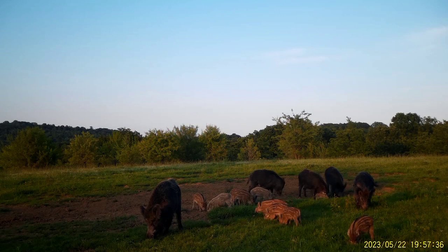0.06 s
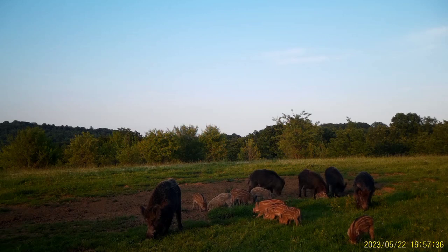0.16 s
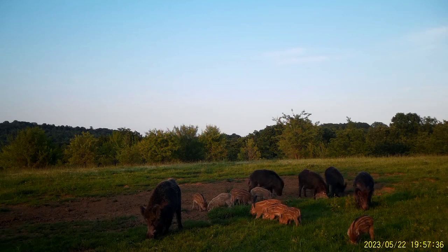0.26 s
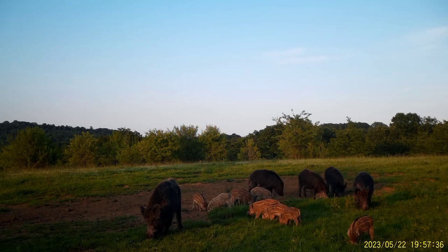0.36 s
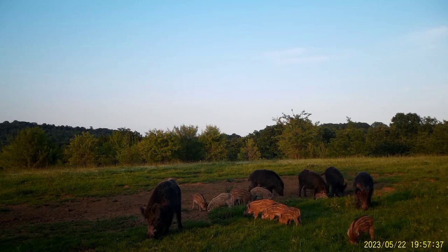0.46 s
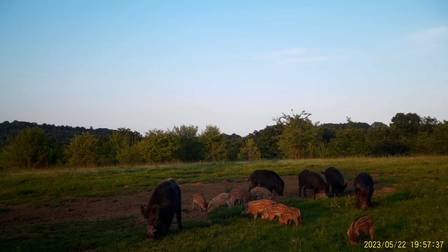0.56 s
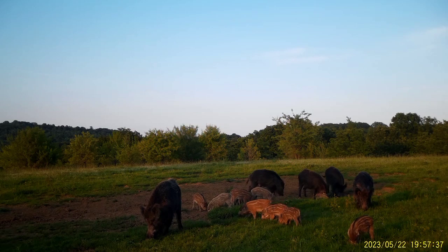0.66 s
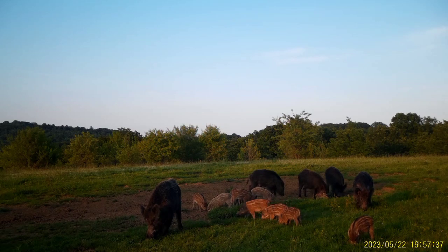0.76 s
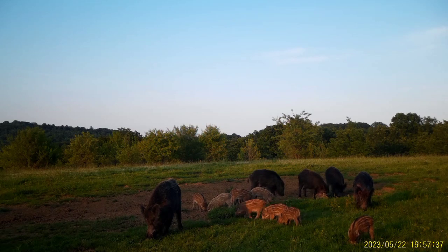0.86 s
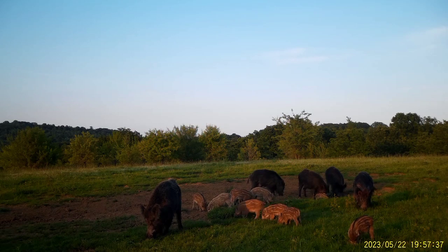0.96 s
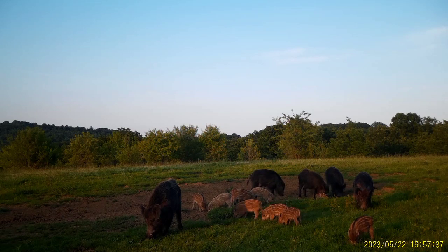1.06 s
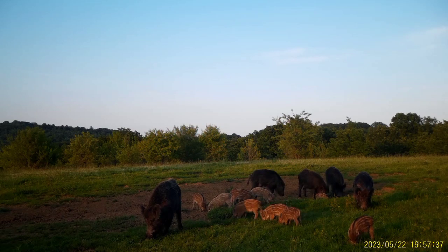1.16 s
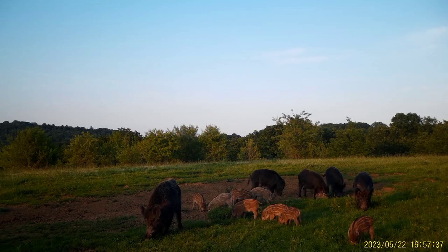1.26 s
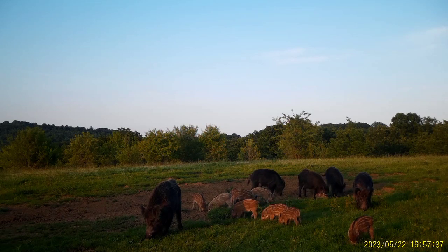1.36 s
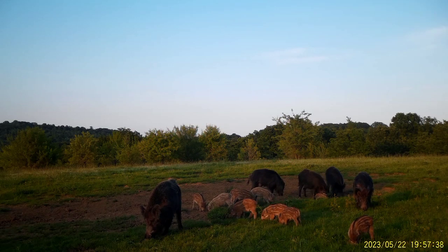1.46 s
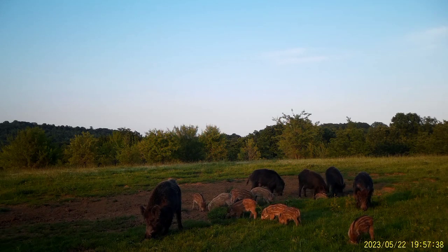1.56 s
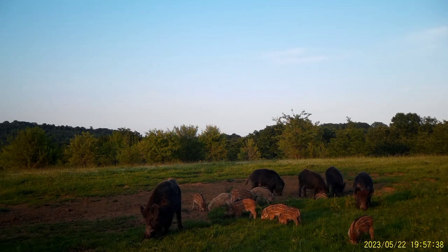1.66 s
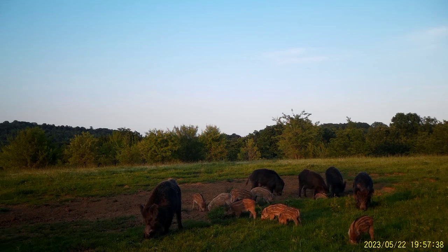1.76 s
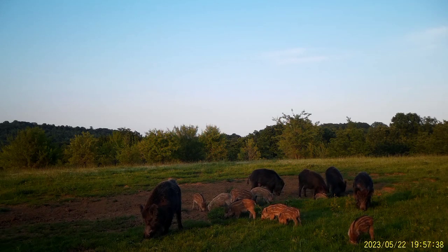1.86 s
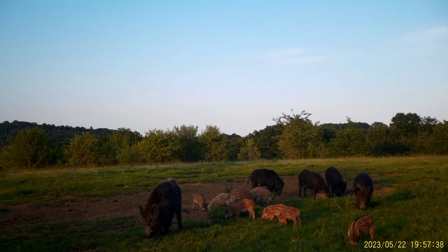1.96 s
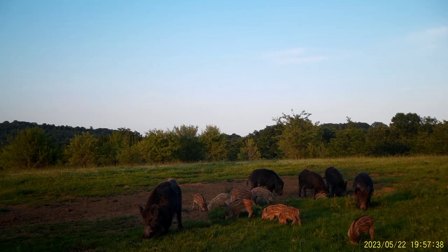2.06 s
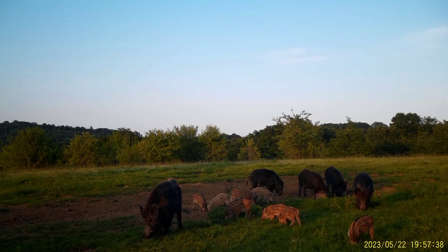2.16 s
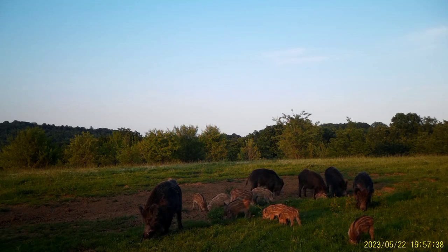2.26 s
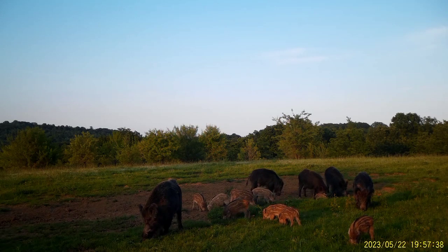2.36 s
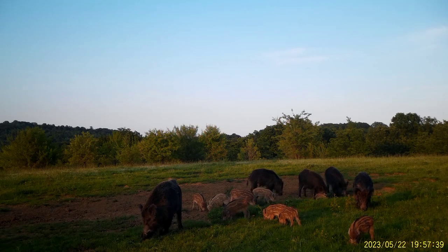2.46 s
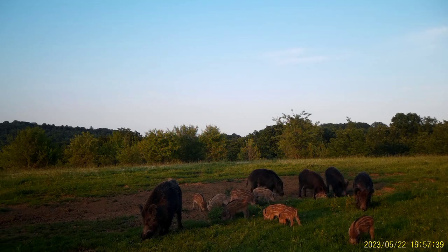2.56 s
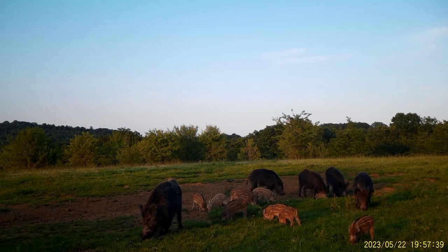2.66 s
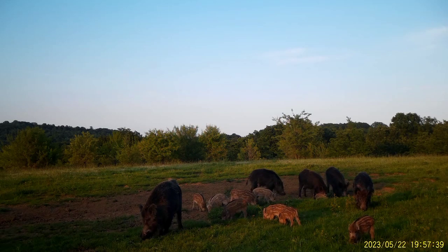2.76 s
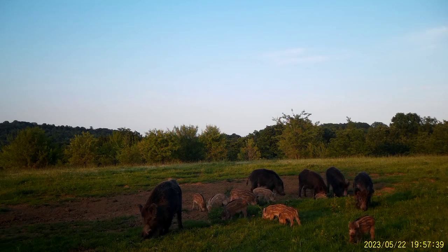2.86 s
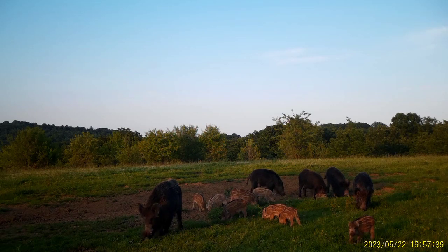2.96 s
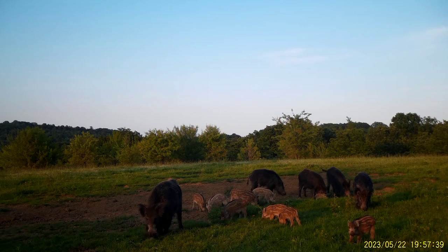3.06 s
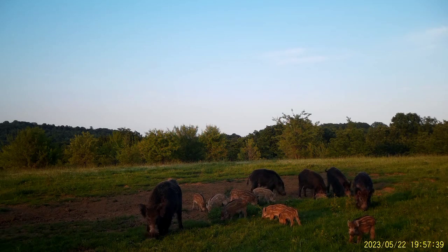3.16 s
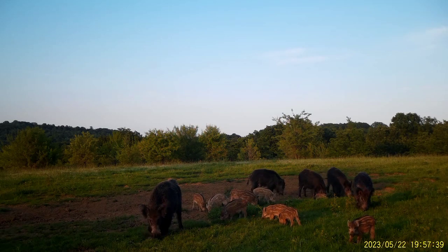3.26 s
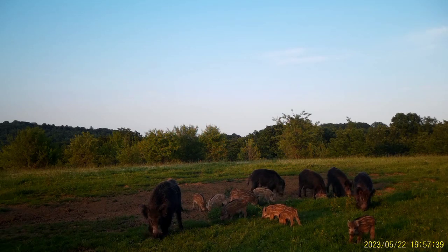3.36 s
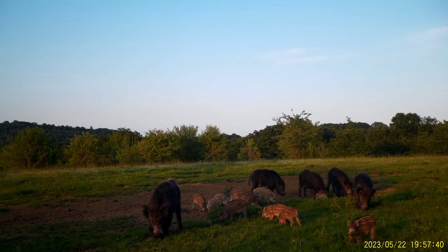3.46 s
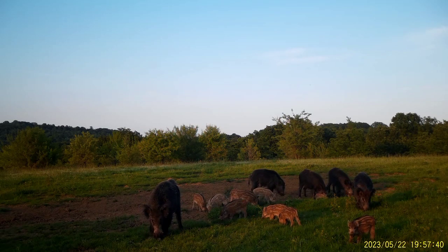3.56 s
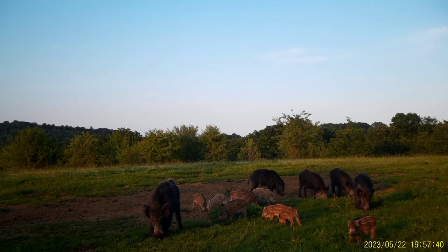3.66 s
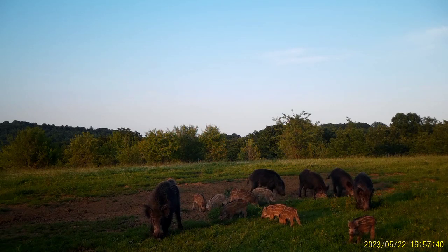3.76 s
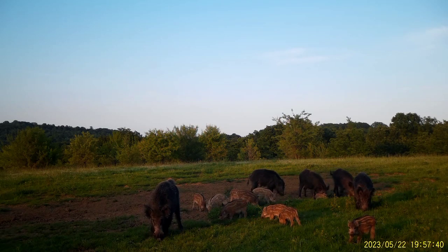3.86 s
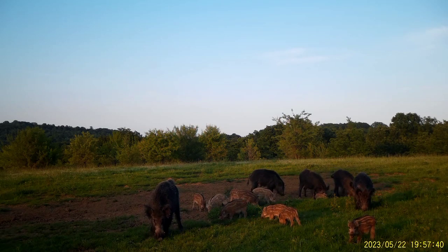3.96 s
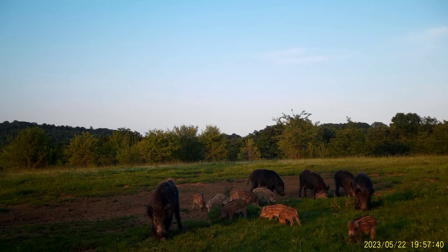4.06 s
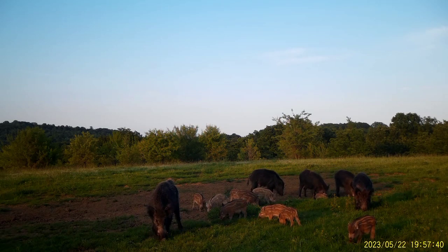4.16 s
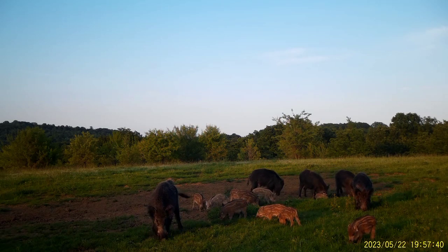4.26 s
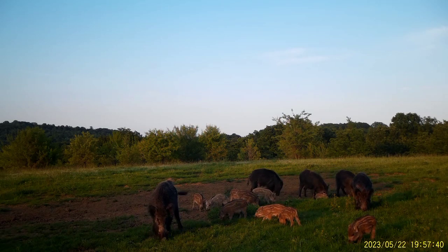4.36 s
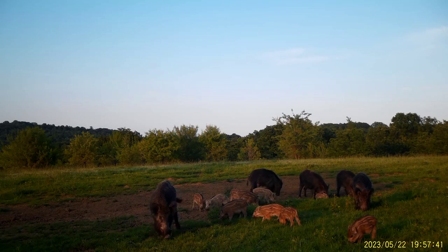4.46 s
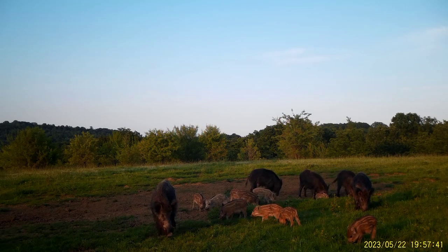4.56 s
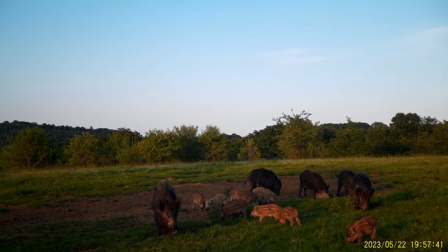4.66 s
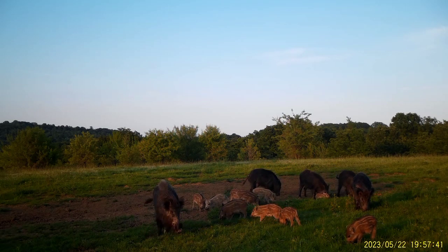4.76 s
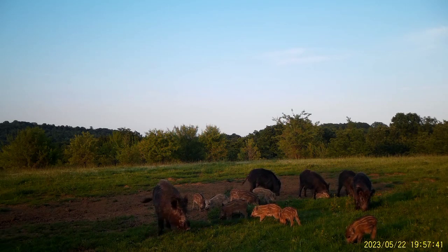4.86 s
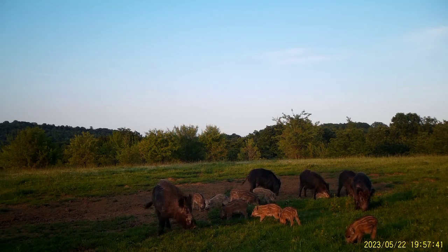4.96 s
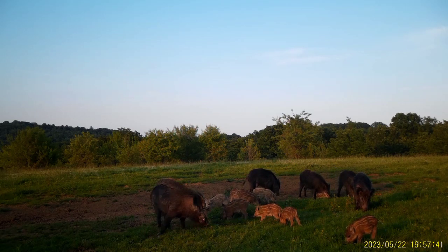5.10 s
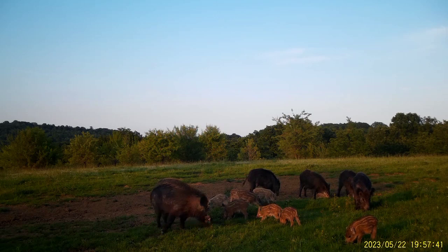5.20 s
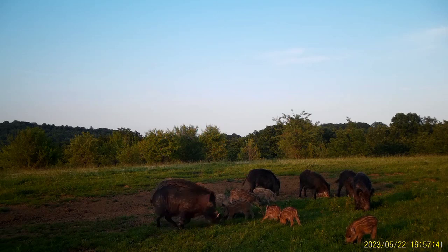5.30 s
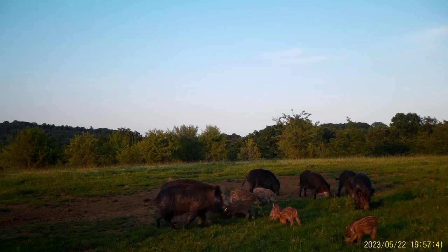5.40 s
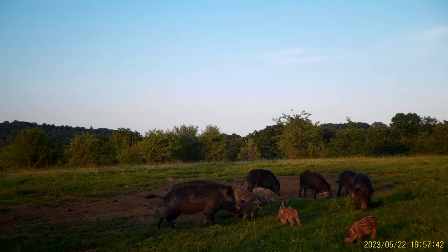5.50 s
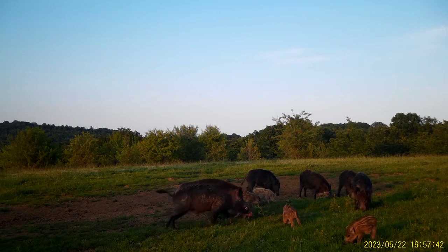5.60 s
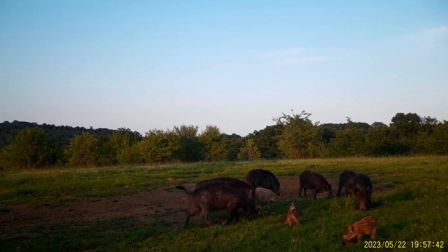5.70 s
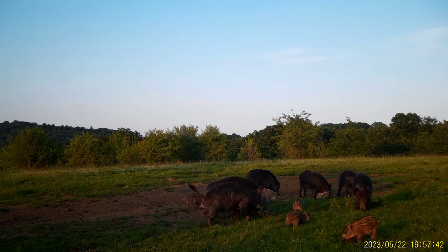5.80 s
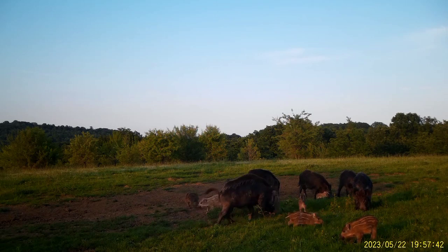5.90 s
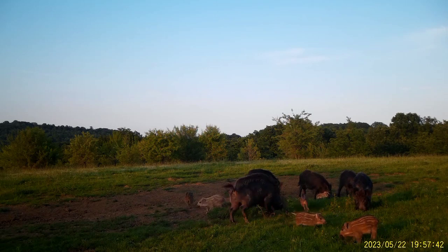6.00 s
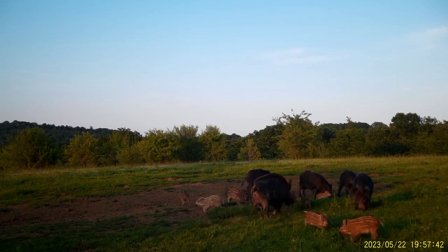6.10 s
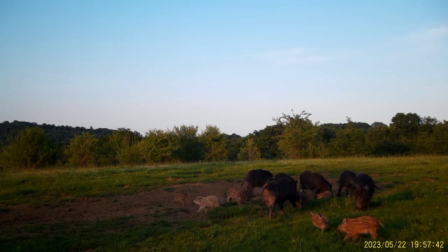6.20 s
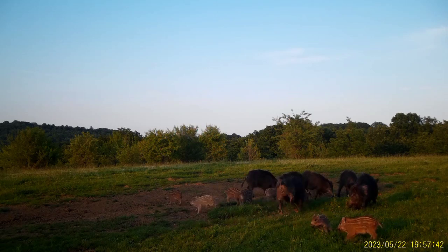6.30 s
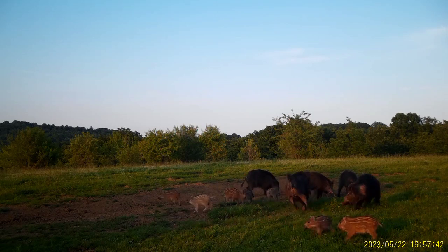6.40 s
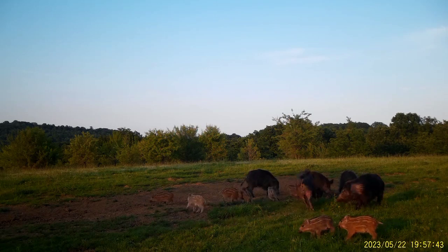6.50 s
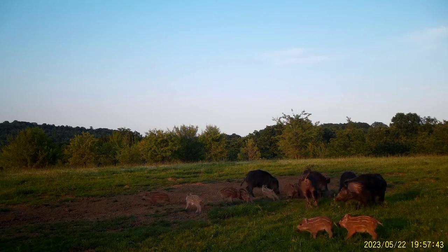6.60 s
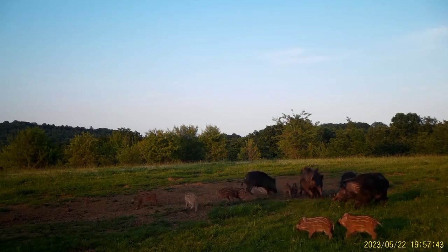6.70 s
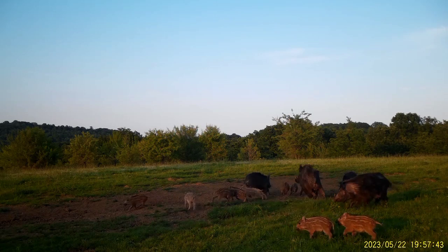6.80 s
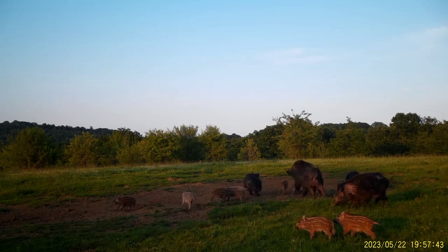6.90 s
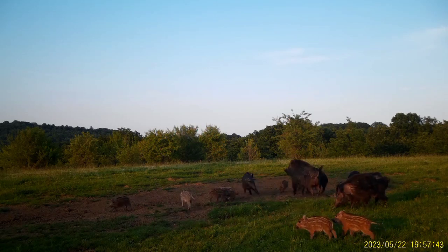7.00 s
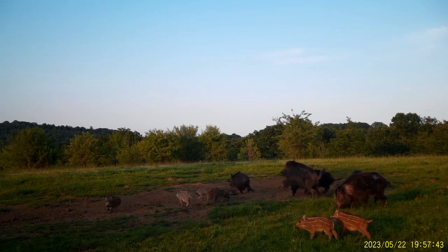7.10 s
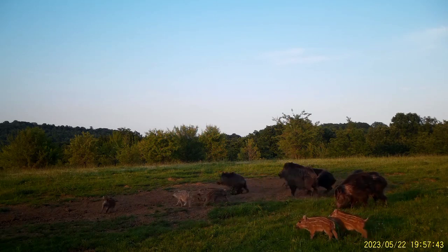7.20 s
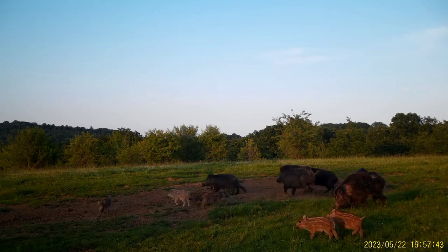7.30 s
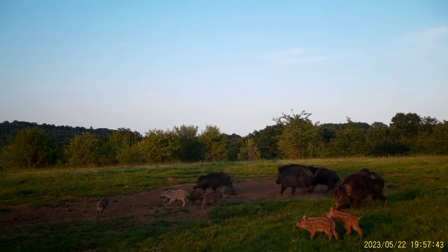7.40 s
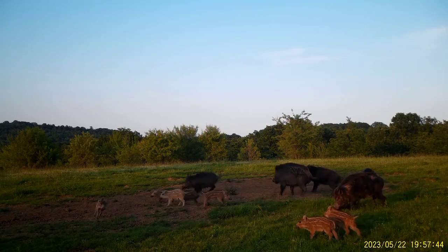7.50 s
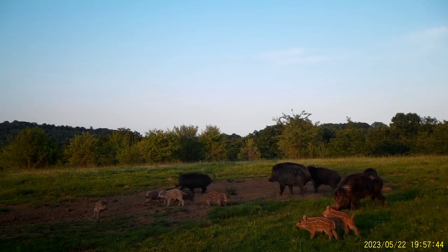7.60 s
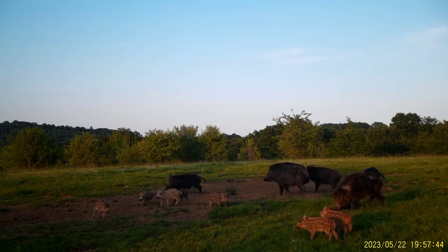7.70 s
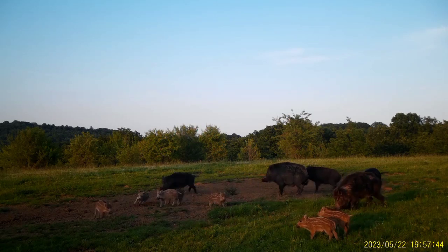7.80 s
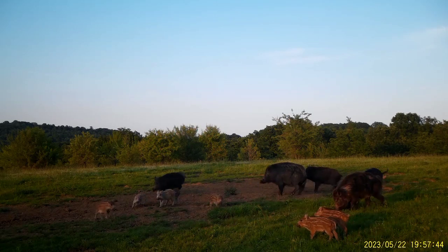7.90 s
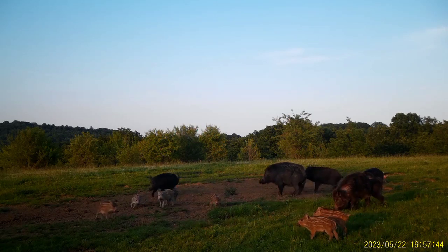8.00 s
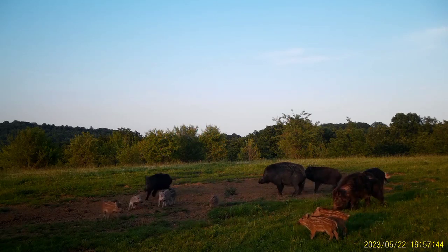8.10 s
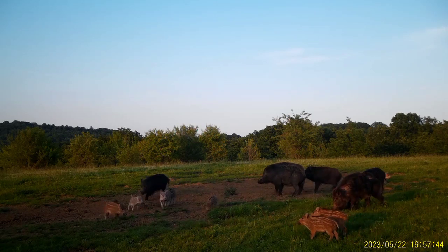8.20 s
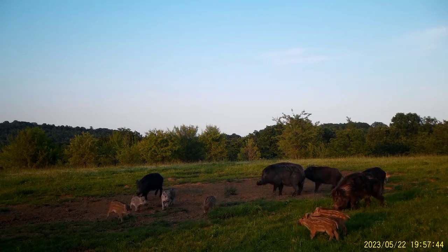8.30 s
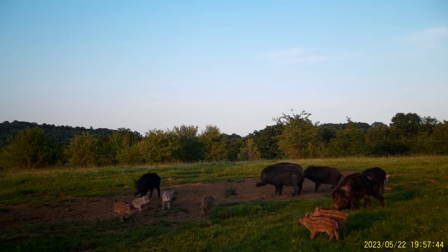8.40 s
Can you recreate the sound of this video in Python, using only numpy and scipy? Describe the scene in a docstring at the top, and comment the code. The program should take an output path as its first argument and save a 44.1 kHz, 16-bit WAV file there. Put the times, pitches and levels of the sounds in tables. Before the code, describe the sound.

A quiet open meadow with gentle hiss, light breeze and low rumble at a fixed outdoor microphone. From 0 to 5 seconds wild pigs feed: soft irregular munching, wet lip smacks, grass brushing, faint snuffles, and a weak low grunt near 2.7. Distant birds whistle sliding, arched motifs, clearest around 0.7 and 1.2, then thin piping from 3.8 to 4.8. Smacks cluster between 3.5 and 4.5, with dull thuds near 1.5 and 3.8 to 4. At about 5.3 a crisp snap precedes heavy thudding steps; a thin high warble comes at 5.6. From 6 to 7 the rumble and grass rush peak, with a short piercing, raspy piglet squeal at 6.1, rattling grunts, cracking stalks and a lower hoarse squeal at 6.7. Grunts continue, thinning toward 8.4, while accelerating falling bird chips run from 7.5 to the end.

```python
"""Wild pigs feed in a meadow at dusk, in soft noise of brushed grass, a hissy camera and a light breeze.
Songbirds whistle arched motifs from the trees; jaws smack and stalks snap as noise ringing in resonances.
Heavy steps shake the camera into low rumble. Past the middle it grows as a sow charges through the group:
rattling grunts from slow pulses, piglet squeals from rasping overtones, and a rush of grass as they scatter.
A run of falling bird chips ends it."""
import sys
import numpy as np
from scipy import signal
from scipy.fft import rfft, irfft
from scipy.io import wavfile
from scipy.ndimage import uniform_filter1d, map_coordinates

SR = 44100
rng = np.random.default_rng(int(sys.argv[2]) if len(sys.argv) > 2 else 0)


def persist_wave(psi):
    """Save psi, clipped to +-1, as 16-bit WAV."""
    counts = np.round(np.clip(psi, -1, 1) * 32767).astype(np.int16)
    wavfile.write(sys.argv[1], SR, np.atleast_2d(counts).T)


N = 372636
TIME = np.arange(N) / SR

# How hard the animals stir the grass; the swish and the munching both follow it with their own offsets.
# Each row: time in seconds, stirring in dB.
STIRRING = [(0.0, -63), (0.87, -61.5), (1.13, -67), (1.55, -63), (1.76, -65), (2.73, -67), (2.94, -62.5),
            (4.94, -63.5), (5.65, -60.5), (6.16, -55.5), (6.35, -57.5), (6.9, -56.5), (8.24, -62),
            (8.45, -62.5)]


def gain_of(db):
    """Decibels to amplitude."""
    return 10 ** (np.asarray(db) / 20)


def evened(x):
    """Scales to rms 1."""
    return x / np.sqrt(np.mean(x ** 2) + 1e-20)


def struck(x):
    """Scales a hit so that its loudest millisecond has rms 1."""
    return x / np.sqrt(uniform_filter1d(x ** 2, size=SR // 1000).max() + 1e-20)


def add(mix, s, sound):
    """Mixes a sound in at a time in seconds."""
    part = mix[max(round(s * SR), 0):][:len(sound)]
    part += sound[:len(part)]


def coloured(x, points):
    """Gives a signal a spectrum drawn through (Hz, dB) points on a log frequency axis, at rms 1."""
    hz, db = np.transpose(points)
    f = np.fft.rfftfreq(len(x), 1 / SR)
    curve_db = np.interp(np.log(f + 1), np.log(hz + 1), db)
    return evened(irfft(rfft(x) * gain_of(curve_db), len(x)))


def wander(size, per_s):
    """Random drift: normal values, per_s of them a second, joined by straight lines."""
    at = np.arange(size) * per_s / SR
    return map_coordinates(rng.standard_normal(size // 8 + 8), [at], order=1, mode="wrap")


def resonate(x, hz, width_hz):
    """A steep resonance: two equal two-pole stages."""
    r = np.exp(-np.pi * width_hz / SR)
    b = [1 - r, 0, r - 1]
    a = [1, -2 * r * np.cos(2 * np.pi * hz / SR), r * r]
    return signal.lfilter(b, a, signal.lfilter(b, a, x))


def swell(s, length, db):
    """Power that rises smoothly to its top at s and falls again."""
    return s - length / 2, (gain_of(db) * np.hanning(int(length * SR))) ** 2


def steady_hiss():
    """Steady noise of the meadow and the camera."""
    # Colour of the hiss. Each row: frequency in Hz, relative density in dB per Hz.
    hiss_colour = [(40, -6.5), (100, 9.5), (250, -7), (550, -23), (850, -8.5), (1500, -16.5), (2900, -18.5),
                   (4000, -13), (9000, -14), (15500, -23.5)]
    return gain_of(-65) * coloured(rng.standard_normal(N), hiss_colour)


def breeze_and_rumble(lumpy_db=2.5, lumps_per_s=12, bed_upper_db=-13.5):
    """Low rumble of heavy steps shaking the camera, over a light breeze: a deep and an upper band of noise."""
    # Level of the bed under the rumble swells, before its lumpiness. Each row: time in seconds, level in dB.
    bed = [(0, -45.5), (.85, -47), (1.2, -52), (2.4, -54), (3.5, -43.5), (4.4, -49.5), (4.9, -51.5),
           (5.55, -33), (6.75, -32.5), (8.45, -42.5)]
    # Rumble swells. Each row: top in seconds, length in seconds, level of the deep band in dB,
    # upper band relative to the deep band in dB.
    rumble_swells = [(0.429, 0.13, -32.5, -28), (0.69, 0.27, -36, -19), (0.936, .14, -36, -22),
                     (1.533, 0.14, -34, -19), (2.88, 0.32, -43, -10), (3.578, 0.11, -33.5, -32),
                     (3.757, 0.16, -35, -29), (4.736, 0.2, -35.5, -22), (5.069, 0.13, -25, -22),
                     (5.27, 0.9, -37.5, -37), (5.634, 0.43, -27, -17.5), (5.846, 0.094, -23.5, -15.5),
                     (5.94, 0.11, -31, -8), (6.269, 0.091, -22.5, -28), (6.417, 0.27, -19.5, -11),
                     (6.547, 0.17, -27, -3.5), (6.802, 0.36, -24, -4), (7.098, 0.39, -31.5, -7),
                     (7.305, 0.29, -30.5, -4), (7.546, 0.17, -30, -20), (7.85, 0.11, -28, -24),
                     (7.932, 0.13, -28.5, -15.5)]
    # Colour of the deep band. Each row: frequency in Hz, relative density in dB per Hz.
    deep_colour = [(8, -3), (20, 7), (31, 4.5), (55, -7.5), (75, -30.5), (110, -32), (300, -109)]
    # Colour of the upper band. Each row: frequency in Hz, relative density in dB per Hz.
    upper_colour = [(30, -49), (55, 1.5), (75, 4.5), (100, -10.5), (150, -22.5), (300, -30), (1000, -94)]
    bed_db = np.interp(TIME, *np.transpose(bed)) + lumpy_db * wander(N, lumps_per_s)
    deep_power = gain_of(bed_db) ** 2
    upper_power = deep_power * gain_of(bed_upper_db) ** 2
    for s, length, db, upper_db in rumble_swells:
        add(deep_power, *swell(s, length, db))
        add(upper_power, *swell(s, length, db + upper_db))
    out = np.zeros(N)
    for colour, power in ((deep_colour, deep_power), (upper_colour, upper_power)):
        noise = coloured(rng.standard_normal(N), colour)
        # level out the noise's own ups and downs, so that it follows the power curve
        own_power = uniform_filter1d(noise ** 2, size=3000) + 0.023
        out += noise * np.sqrt(power / own_power)
    return out


def grass(blades_per_s=500, size_db=6.0, crackle_db=-5, flicker_db=1.91, swish_db=4):
    """Legs and snouts brush the grass: a swish with single blades ticking in it."""
    # Running legs sweep through the grass. Each row: top in seconds, length in seconds, level in dB.
    sweeps = [(6.015, 0.14, -53.5), (6.312, 0.32, -52), (6.548, 0.25, -51.5), (7.033, 0.33, -59)]
    # Colour of brushed grass. Each row: frequency in Hz, relative density in dB per Hz.
    grass_colour = [(100, 10), (400, 10), (800, 4.5), (1500, 5), (2700, 4), (3800, -2), (5500, -2),
                    (7300, -1), (8800, -3), (11000, -0.5), (12500, -0.5), (14200, -2), (16000, -0.5)]
    blade_sizes = gain_of(size_db * np.minimum(rng.exponential(1, N), 4))
    blades = blade_sizes * (rng.random(N) < blades_per_s / SR)
    decay = np.exp(-1 / (0.00057 * SR))  # each tick dies away within a few milliseconds
    ticks = signal.lfilter([1], [1, -decay], blades) * rng.standard_normal(N)
    swish = rng.standard_normal(N) + gain_of(crackle_db) * evened(ticks)
    power = gain_of(swish_db + np.interp(TIME, *np.transpose(STIRRING))) ** 2
    for s, length, db in sweeps:
        add(power, *swell(s, length, db))
    return coloured(swish, grass_colour) * np.sqrt(power) * gain_of(flicker_db * wander(N, 55))


def whistle(hz, db, waver=0.0087):
    """A nearly pure bird tone along a pitch curve, unsteady after its way through the air."""
    phase = 2 * np.pi * np.cumsum(hz * (1 + waver * wander(len(hz), 326))) / SR
    fade = signal.windows.tukey(len(hz), .35)
    return gain_of(db) * evened(np.sin(phase) * fade)


def birds():
    """Repeated motifs, a thin warble and a run of falling chips from the edge of the wood."""
    # Motifs by name, built of arched notes. Each row: start within the motif in seconds, length in seconds,
    # pitch at start, middle and end in Hz, level relative to the song in dB.
    motifs = {"slide": [(0.0026, .17, 4350, 3560, 2100, 1)], "drawl": [(0, .06, 2330, 2580, 2600, -1),
              (.045, .12, 2600, 2420, 2230, 0)], "flourish": [(0, .07, 2450, 2400, 2280, 0),
              (.085, .045, 2200, 2950, 2250, -1), (.13, .11, 2250, 3550, 2300, -6.5),
              (.2, .048, 2800, 2700, 2200, 3), (.365, .04, 2200, 2080, 1750, 3)],
              "dip": [(0, .05, 2830, 2980, 2850, 0), (.035, .06, 2680, 2540, 2900, 0),
              (.09, .07, 2840, 3000, 2880, 1)], "piping": [(0, .045, 3750, 3450, 3200, -2),
              (.11, .09, 3880, 3820, 3790, 0)], "hook": [(0, .02, 3480, 3200, 2950, 9),
              (.04, .07, 3050, 3680, 3280, -4)], "slur": [(0, .1, 2520, 2410, 2500, -2),
              (.336, .066, 2180, 2350, 2750, -6)]}
    # When the birds sing. Each row: start in seconds, motif name, level in dB.
    song = [(0, "slide", -73), (.503, "drawl", -69.5), (.655, "flourish", -64.5), (1.133, "drawl", -74),
            (1.217, "flourish", -66), (1.735, "dip", -75), (2.199, "dip", -71.5), (2.71, "dip", -71.5),
            (3.253, "slur", -75), (3.8, "piping", -71.5), (4.07, "piping", -68), (4.345, "piping", -68),
            (4.564, "hook", -70.5), (4.625, "piping", -67.5)]
    # Thin warbled whistle. One row: start in seconds, length in seconds, pitch in Hz, swing in Hz,
    # warbles per second, level in dB.
    warble = (5.58, .23, 7150, 170, 23, -66)
    out = np.zeros(N)
    for s, motif, db in song:
        for after_s, length, first, middle, last, note_db in motifs[motif]:
            arch = np.polyfit([0, .5, 1], [first, middle, last], 2)
            pitch_hz = np.polyval(arch, np.linspace(0, 1, int(length * SR)))
            add(out, s + after_s, whistle(pitch_hz, db + note_db))

    s, length, hz, swing_hz, per_s, db = warble
    t = np.arange(0, length, 1 / SR)
    add(out, s, whistle(hz + swing_hz * np.sin(2 * np.pi * per_s * t), db, waver=.016))

    # chips follow each other ever faster, towards a shortest gap from start to start
    chip_start_s, chip_length_s, chip_count, chip_db = 7.462, .0403, 11, -67
    chip_top_hz, chip_end_hz = 4950, 4580
    shortest_gap_s, extra_gap_s, quickening = .062, .1, .685
    s = chip_start_s
    for k in range(chip_count):
        falling_hz = np.linspace(chip_top_hz, chip_end_hz, int(chip_length_s * SR))
        add(out, s, whistle(falling_hz, chip_db, waver=.04))
        s += shortest_gap_s + extra_gap_s * quickening ** k
    return out


def smack(s, db, hz, attack_s=0.0014, t60=0.023, width_hz=420, wet_db=-10, jaw_db=-11):
    """Lips part with a short wet crackle that rings the mouth cavity."""
    t = np.arange(SR // 12) / SR
    drive = rng.standard_normal(len(t)) * gain_of(-60 * t / t60) * (1 - np.exp(-t / attack_s))
    pop = struck(resonate(drive, hz, width_hz))
    pop += gain_of(wet_db) * struck(resonate(drive, 1900, 3300))
    pop += gain_of(jaw_db) * struck(resonate(drive, 570, 540))
    return s, gain_of(db) * struck(pop)


def chewing(count=110, munch_db=2.0, spread_db=3, middle_hz=1300, spread_octaves=0.61):
    """The rest of the herd munches softly at random moments, louder when the grass is stirred."""
    out = np.zeros(N)
    for place, size, tone in rng.random((count, 3)):
        s = place * N / SR
        db = np.interp(s, *np.transpose(STIRRING)) + munch_db + spread_db * (2 * size - 1)
        add(out, *smack(s, db, middle_hz * 2 ** (spread_octaves * (tone - .5))))
    return out


def snuffle(s, length, db):
    """A snout blows through the turf: a short breath of coloured noise."""
    # Colour of the breath. Each row: frequency in Hz, relative density in dB per Hz.
    snout_colour = [(200, 2.5), (500, 5), (1400, 4.5), (2500, 0.5), (5000, -14.5)]
    size = int(length * SR)
    breath = coloured(rng.standard_normal(size), snout_colour)
    return s, gain_of(db) * evened(breath * signal.windows.tukey(size))


def snap(s, db, hz, t60, splinter_db=-20, splinter_t60=0.025, crack_db=5):
    """A stalk breaks with a sharp crack and its fibres tear after it; it also serves for bright, crisp smacks."""
    # What a stalk rings with. Each row: frequency in Hz, width in Hz, relative level in dB.
    stalk_modes = [(1940, 360, 5.5), (2860, 900, -25), (3900, 2500, 8), (5900, 3000, 12), (10760, 2600, 10)]
    t = np.arange(SR // 16) / SR
    crack = gain_of(-60 * t / t60)
    splinters = gain_of(splinter_db - 60 * t / splinter_t60)
    drive = rng.standard_normal(len(t)) * (crack + splinters)
    ring = sum(gain_of(mode_db) * evened(resonate(drive, f, width)) for f, width, mode_db in stalk_modes)
    bright = evened(resonate(drive, hz, 0.81 * hz))
    return s, gain_of(db) * struck(evened(ring) + gain_of(crack_db) * bright)


def thump(s, db, hz):
    """One dull thud or knock, as from a heavy step, a swing or two long, peaking at s."""
    t = np.arange(-SR // 12, SR // 12) / SR
    thud = np.cos(2 * np.pi * hz * t) / np.cosh(4.23 * hz * t)
    return s + t[0], -gain_of(db) * thud * np.hanning(len(t))


def grunt(start, length, db, per_s, throat_hz, throat_db, mouth_hz, mouth_db, jitter=.1, uneven_db=3.0):
    """Slack folds flap slowly; each flap rings chest and throat, and its puff of air rasps in the mouth."""
    chest_hz, chest_width_hz, mouth_width_hz = 177.4, 112, 260
    throat_width_share = 0.21  # of the throat's frequency
    puff_share = .28  # decay time of a puff, as a share of one flap
    all_rough_per_s = 135  # faster folds run rougher; at this rate only air noise is left
    size = int(length * SR)
    rough = np.clip(per_s / all_rough_per_s, 0, 1)
    turns = np.cumsum(per_s * (1 + jitter * rough * wander(size, 42))) / SR
    flaps = np.diff(np.floor(turns), prepend=-1) * gain_of(uneven_db * wander(size, 52.6))
    opening = rough ** 2 + np.exp(-(turns % 1) / puff_share)  # rough folds never quite close
    puffs = opening * rng.standard_normal(size)
    folds = np.sqrt(1 - rough) * evened(flaps) + np.sqrt(rough) * evened(puffs)
    effort = .5 + np.sin(np.linspace(0, np.pi, size))
    # silence at the end leaves room to ring out
    folds, air = (np.pad(x * effort, (0, SR // 20)) for x in (folds, puffs))
    voice = evened(resonate(folds, chest_hz, chest_width_hz))
    voice += gain_of(throat_db) * evened(resonate(folds, throat_hz, throat_width_share * throat_hz))
    voice += gain_of(mouth_db) * evened(resonate(air, mouth_hz, mouth_width_hz))
    return start, gain_of(db) * evened(voice)


def squeal(rows, flutter_hz=370, sideband=0.82):
    """A tight voice; a slower vibration adds a line above each overtone, and roughness jitters it into rasp."""
    # Overtones in order from the fundamental. Each row: multiple of the pitch, level in dB.
    overtones = [(1, 4), (2, -0.5), (3, -7)]
    s, *columns = np.transpose(rows)
    t = np.arange(s[0], s[-1], 1 / SR)
    hz, db, rough = (np.interp(t, s, c) for c in columns)
    phase = 2 * np.pi * np.cumsum(hz * (1 + .07 * rough * wander(len(t), 1500))) / SR
    beat = 2 * np.pi * np.cumsum(flutter_hz * (1 + 0.086 * wander(len(t), 100))) / SR
    strain = np.clip(hz / 2500, 0, 1) ** 5  # the higher the voice, the stronger its overtones
    voice = np.zeros(len(t))
    for k, part_db in overtones:
        line = np.sin(k * phase) + sideband * strain * np.sin(k * phase + beat)
        voice += gain_of(part_db) * strain ** (k - 1) * line
    return s[0], gain_of(db) * evened(voice) * signal.windows.tukey(len(t), .1)


def echo(x, t60, delay_s):
    """A diffuse return from the ground and the trees: decaying noise after a short delay."""
    t = np.arange(SR // 2) / SR
    tail = rng.standard_normal(len(t)) * gain_of(-60 * t / t60) * (t > delay_s)
    return signal.oaconvolve(x, tail / np.linalg.norm(tail))[:N]


def scene():
    """The herd close by, birds far off, breeze, rumble and hiss at the camera."""
    # Snuffling snouts. Each row: start in seconds, length in seconds, level in dB.
    snuffle_rows = [(0.297, 0.17, -61.5), (3.922, 0.077, -62), (4.095, 0.14, -60.5), (6.149, 0.057, -49.5),
                    (6.717, 0.099, -49.5), (6.834, 0.1, -55.5)]
    # Smacking jaws. Each row: start in seconds, level of the loudest millisecond in dB, mouth resonance in Hz.
    smack_rows = [(0.565, -47, 745), (1.393, -49.5, 1060), (1.937, -45.5, 1230), (1.962, -54, 1230),
                  (2.058, -57, 1620), (2.201, -51, 1510), (2.769, -51, 1100), (3.027, -52, 910),
                  (3.564, -44, 1290), (3.574, -49, 1060), (3.63, -49.5, 950), (3.905, -45.5, 1220),
                  (3.917, -43.5, 885), (4.003, -49, 1200), (4.285, -50, 1270), (4.374, -39, 790),
                  (4.383, -41.5, 1060), (4.536, -49.5, 1220), (4.823, -50.5, 785), (5.921, -46, 2240),
                  (6.29, -44.5, 1040), (6.517, -42, 1170), (6.741, -40.5, 1120), (7.893, -44, 1120),
                  (8.278, -44, 1220)]
    # Snapping stalks and a few bright, crisp smacks. Each row: start in seconds, level of the loudest
    # millisecond in dB, crack resonance in Hz, time for the crack to fall by 60 dB in seconds.
    snap_rows = [(1.394, -50, 2500, .008), (2.9744, -47, 2150, 0.012), (4.2773, -48.5, 2240, 0.01),
                 (4.373, -55, 2620, 0.023), (4.7612, -41.5, 5140, 0.0077), (4.7655, -44.5, 2660, 0.011),
                 (5.3207, -46.5, 2900, 0.032), (5.3475, -30.5, 2620, 0.0035), (6.3028, -39, 7500, .028),
                 (6.516, -40.5, 2050, .008), (6.5818, -38.5, 9800, .009), (6.5966, -42.5, 2760, .008),
                 (6.7353, -38, 2000, 0.014), (6.7973, -40.5, 2130, .008), (6.882, -37.5, 11000, .005),
                 (7.673, -47, 2490, .006)]
    # Dull thuds and knocks. Each row: time of the peak in seconds, peak level in dB, frequency in Hz.
    thump_rows = [(1.52, -28, 31.5), (3.762, -24, 55.5), (3.965, -17, 87.6), (4.279, -40, 370),
                  (5.69, -13.5, 51), (6.773, -19.5, 78), (6.819, -16.5, 56)]
    # Grunts. Each row: start in seconds, length without the ringing in seconds, level in dB, flaps per second,
    # throat in Hz, throat relative to the chest in dB, mouth in Hz, mouth relative to the chest in dB.
    grunt_rows = [(2.707, 0.23, -58, 48.5, 550, -8.5, 1070, -12),
                  (6.041, 0.11, -46, 33, 422, -1.5, 1390, -4.5),
                  (6.159, .17, -52, 41, 382, -1.5, 1700, -19), (6.44, 0.11, -49.5, 38, 350, -4, 825, -11),
                  (6.569, 0.21, -50.5, 40, 411, -6.5, 1600, -15), (6.718, 0.18, -54, 74, 575, 16, 1110, 8),
                  (6.811, .12, -51, 59, 378, 3, 1540, 1.5), (6.944, 0.18, -52.5, 40, 305, -5.5, 900, -17),
                  (7.114, 0.12, -54, 56, 380, -3, 850, -28), (7.213, 0.32, -55.5, 33.5, 314, -4, 1210, -18),
                  (7.429, 0.19, -51.5, 26.3, 397, 2, 740, -21),
                  (7.537, 0.12, -50.5, 33, 357, 2.5, 1300, -14),
                  (7.887, 0.067, -53, 50, 371, 0.5, 1110, -16), (8.165, 0.15, -54, 71, 260, -2.5, 423, -7),
                  (8.364, 0.16, -51.5, 33, 427, -6, 656, -19)]
    # Squeals, one table each. Each row: time in seconds, pitch in Hz, level in dB, roughness (0 is clear, 1 hoarse).
    squeal_tables = [
        [(6.105, 2400, -61, 0.15), (6.13, 2520, -53, .3), (6.15, 2640, -43.5, 0.8), (6.175, 2530, -52.5, 1.16),
         (6.205, 2370, -51.5, 0.25), (6.24, 2080, -69, .2)],
        [(6.69, 2056, -57, 0.44), (6.74, 2050, -55, 1), (6.78, 2150, -56, 0.6), (6.815, 2080, -61, 0.5)],
    ]

    herd, thumps = np.zeros(N), np.zeros(N)
    for source, rows in ((snuffle, snuffle_rows), (smack, smack_rows), (snap, snap_rows), (grunt, grunt_rows)):
        for row in rows:
            add(herd, *source(*row))
    for rows in squeal_tables:
        add(herd, *squeal(rows))
    for row in thump_rows:
        add(thumps, *thump(*row))
    herd += chewing()
    herd += gain_of(-13.5) * echo(herd, t60=0.21, delay_s=0.0061)
    song = birds()
    song += gain_of(-10.5) * echo(song, t60=0.7, delay_s=0.0083)
    return (herd + song + grass() + breeze_and_rumble() + thumps + steady_hiss())[None]


def record(dry):
    """The camera's band limit: a steep low-pass that takes off the top treble."""
    edge_hz = 15700
    low_pass = signal.firwin(511, edge_hz, window=("kaiser", 9), fs=SR)
    return signal.oaconvolve(dry, low_pass[None], "same")


dry = scene()
out = record(dry)
persist_wave(out)
```